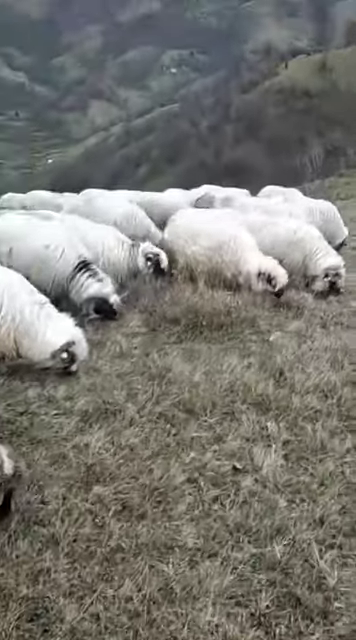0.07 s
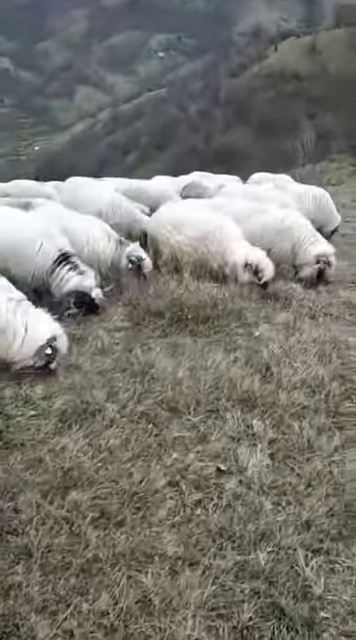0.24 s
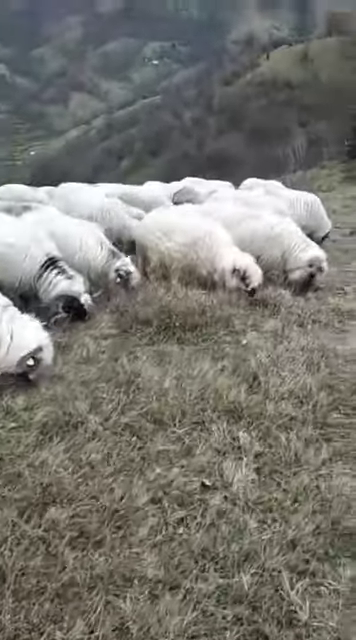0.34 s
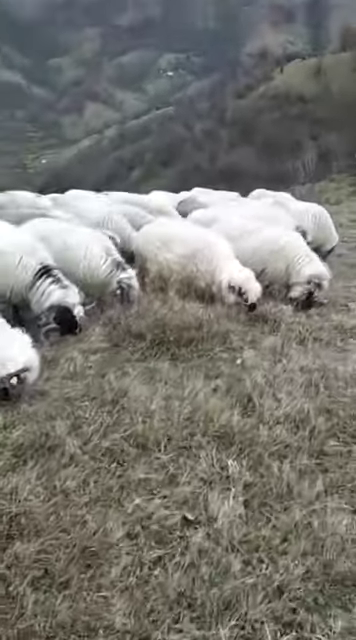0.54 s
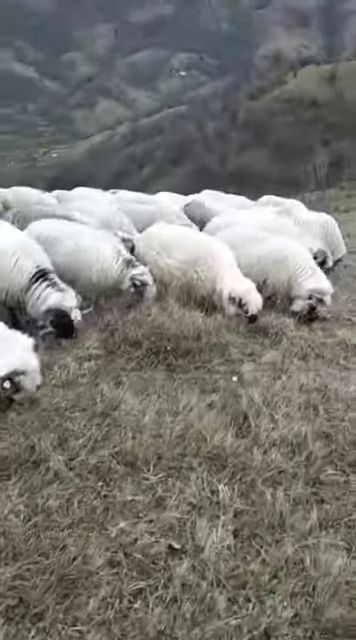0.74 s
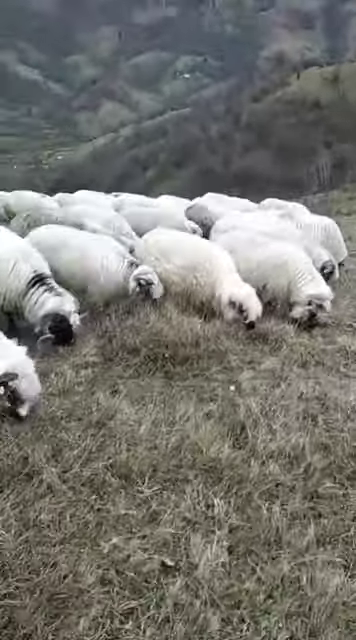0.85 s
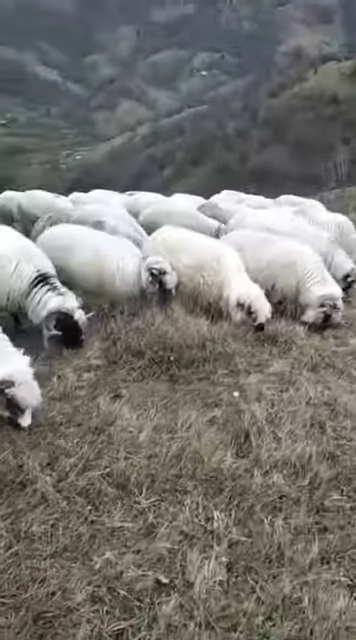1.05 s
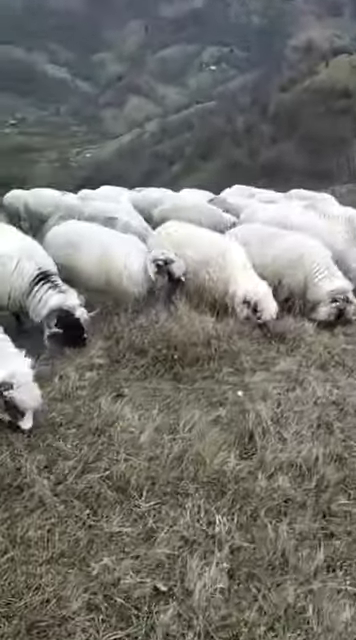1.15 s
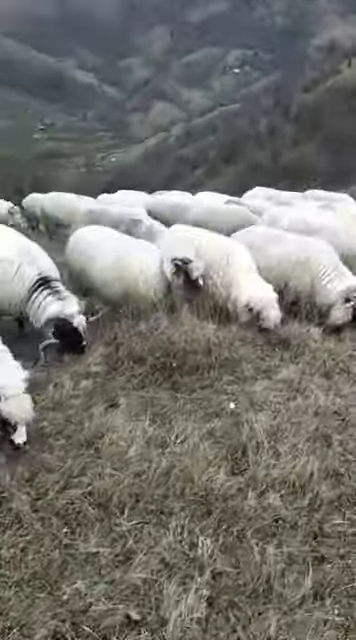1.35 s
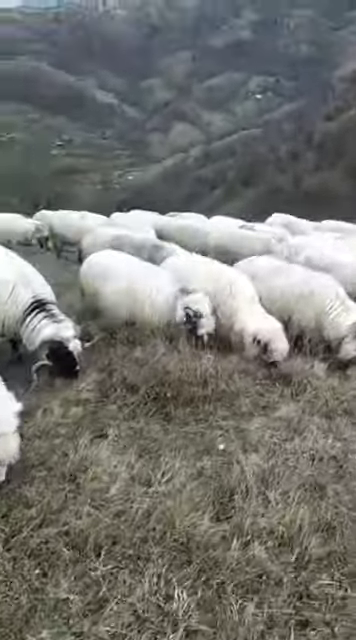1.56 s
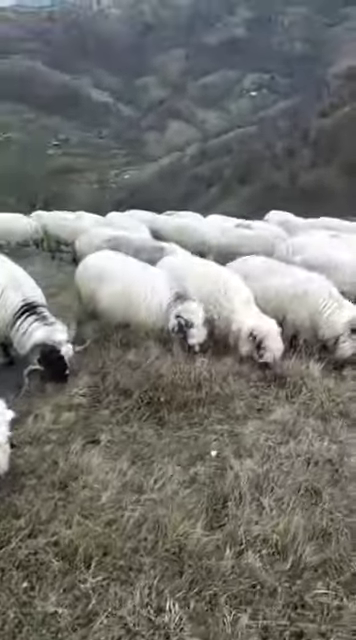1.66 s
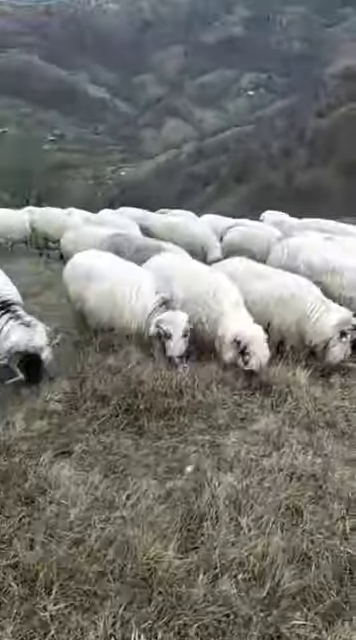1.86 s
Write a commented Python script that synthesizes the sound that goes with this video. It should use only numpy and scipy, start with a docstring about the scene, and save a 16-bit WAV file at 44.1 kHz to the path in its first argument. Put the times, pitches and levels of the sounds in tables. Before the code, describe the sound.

Two sheep bells clank close by on a quiet open hillside. The larger, lower one gives hollow, ringing clanks at about 0.2, 0.6, 1.0 and 1.4 seconds, then softer taps as it hums on. A smaller, higher bell clinks between 0.5 and 0.8 seconds and again at 1.3. Far bells ping faintly on the left, with two barely audible hoof thuds and light wind puffs on the microphone.

```python
"""On an open hillside, two sheet-metal sheep bells clank as the animals tug at the grass.
Each hit of a clapper gives a short hollow note from the air in the bell's mouth, long beating
tones from its metal wall and a bright clank. Behind them far bells ping, hooves thud,
torn grass crackles faintly and a light wind touches the microphone."""
import sys
import numpy as np
from scipy import signal
from scipy.fft import rfft, irfft, next_fast_len
from scipy.io import wavfile

SR = 44100
rng = np.random.default_rng(int(sys.argv[2]) if len(sys.argv) > 2 else 0)


def dump(signal):
    """Clip the signal to [-1, 1] and save it as 16-bit WAV at the path in sys.argv[1]."""
    limited = np.clip(np.atleast_2d(signal).T, -1, 1)
    pcm = np.round(limited * 32767).astype(np.int16)
    wavfile.write(sys.argv[1], SR, pcm)


N = 83790
TIME = np.arange(N) / SR
FFT_SIZE = next_fast_len(N + SR // 2)
FREQS = np.maximum(np.arange(FFT_SIZE // 2 + 1) * SR / FFT_SIZE, 1)


def from_db(db):
    """Turn decibels into a gain."""
    return 10 ** (np.asarray(db) / 20)


def unit_rms(x):
    """Scale a signal to an average (rms) level of 1."""
    return x / np.sqrt(np.mean(x ** 2) + 1e-20)


def at_hz(table, hz, column=1):
    """Read between the rows of a table, on a log-frequency scale."""
    table = np.array(table, float)
    return np.interp(np.log(hz), np.log(table[:, 0]), table[:, column])


def filtered(x, gain):
    """Give each frequency its own gain."""
    return irfft(rfft(x, FFT_SIZE) * gain, FFT_SIZE)[..., :N]


def noise(spectrum, channels=1):
    """Noise with the given spectrum, at an rms level of 1."""
    white = rng.standard_normal((channels, N))
    return unit_rms(filtered(white, from_db(at_hz(spectrum, FREQS))))


def clicks(times, sizes):
    """One click for each hit."""
    out = np.zeros(N)
    np.add.at(out, np.clip(np.round(times * SR).astype(int), 0, N - 1), sizes)
    return out + 1e-18


def fading(times, db, ring_s):
    """Level of a vibration that gains energy at each hit and falls 60 dB in ring_s."""
    energy_kept = from_db(-60 / (ring_s * SR)) ** 2
    return np.sqrt(signal.lfilter([1], [1, -energy_kept], clicks(times, from_db(db) ** 2)))


def smoothed(x, rise_s):
    """Round off sudden jumps."""
    kept = np.exp(-1 / (rise_s * SR))
    return signal.lfilter([1 - kept], [1, -kept], x)


def sine(hz):
    """A pure tone of steady or moving pitch, at a random phase."""
    return np.sin(2 * np.pi * (np.cumsum(hz * np.ones(N)) / SR + rng.random()))


def ring(x, hz, ring_s):
    """Each click starts a tone that falls 60 dB in ring_s."""
    kept = np.exp(-np.log(1000) / (ring_s * SR))
    step = 2 * np.pi * hz / SR
    return signal.lfilter([0, np.sin(step)], [1, -2 * kept * np.cos(step), kept * kept], x)


def swell(time, length, db):
    """A smooth hump of level, centred on the given time."""
    return from_db(db) * np.exp(-2 * ((TIME - time) / (.5 * length)) ** 2)


def waver(rate_hz):
    """A slow random wobble, roughly between -1 and 1."""
    points = rng.standard_normal(64)
    return np.interp(TIME * rate_hz, np.arange(len(points)), points)


# the hush of the hillside: (frequency [Hz], relative level [dB])
AIR_SPECTRUM = [(25, 3.5), (280, -15), (540, -3), (800, -21.5), (1400, -16.5), (2600, -21), (3500, -31),
                (6000, -27.5), (10000, -42.5), (15500, -57)]

def air():
    """Still air and the distant flock blend into a hush, most alike in both ears near 300 Hz."""
    alike = at_hz([(50, 0.53), (300, 0.95), (5000, 0.12)], FREQS)
    mid, side = noise(AIR_SPECTRUM, channels=2)
    shared = filtered(mid, np.sqrt(1 + alike))
    opposite = filtered(side, np.sqrt(1 - alike)) * np.array([[1], [-1]])
    return from_db(-52.5) * (shared + opposite)


# tearing grass: (frequency [Hz], relative level [dB])
GRASS_SPECTRUM = [(2500, -8.5), (6000, -10.5), (15500, -35.5)]

def grass(snaps_per_s=110):
    """Blades of grass tear with tiny snaps at random moments."""
    snaps = (rng.random(N) < snaps_per_s / SR) * rng.standard_normal((2, N))
    return from_db(-70.5) * unit_rms(filtered(snaps, from_db(at_hz(GRASS_SPECTRUM, FREQS))))


# puffs of wind: (time [s], length [s], level on the left [dB])
WIND_GUSTS = [(.36, 0.31, -40), (1.18, 0.23, -36), (1.865, 0.14, -33.5)]
# their rumble: (frequency [Hz], relative level [dB])
WIND_SPECTRUM = [(35, -2), (120, -14.5), (2500, -92)]

def wind():
    """Gusts rumble on the microphone, mostly on the left."""
    level = sum(swell(*gust) for gust in WIND_GUSTS)
    return level * noise(WIND_SPECTRUM, channels=2) * from_db([[0], [-19]])


# pings of far bells: (time [s], pitch [Hz], relative level [dB])
FAR_PINGS = [(0.064, 1378, -41), (0.349, 538.6, -47.5), (1.432, 1362, -46), (1.636, 1390, -47.5)]

def far_bells(ring_cycles=330):
    """Soft short notes far to the left, their clank lost on the way."""
    notes = 0
    for time, hz, db in FAR_PINGS:
        level = fading(np.array([time]), [db], ring_cycles / hz)
        notes = notes + smoothed(level, rise_s=0.0014) * sine(hz)
    return np.array([[2.42], [-0.082]]) * notes  # left and right gains


# hoof steps: (time [s], length [s], centre frequency [Hz], level [dB])
HOOF_STEPS = [(0.934, 0.029, 278, -47), (1.416, 0.025, 216, -43)]

def hooves(half_width_octaves=0.68):
    """Each hoof lands on turf with a short, dull burst of noise."""
    out = 0
    for time, length, hz, db in HOOF_STEPS:
        band = np.exp(-.5 * (np.log2(FREQS / hz) / half_width_octaves) ** 2)
        thud = unit_rms(filtered(rng.standard_normal(N), band))
        out = out + swell(time, length, db) * thud
    return out


# the clapper's contact: (frequency [Hz], relative level [dB])
KNOCK_SPECTRUM = [(300, -22), (1400, 4), (2200, 0), (3500, -14.5), (6000, -10), (15500, -59.5)]

def knock(times, db):
    """The clapper meets the metal with a very short burst of noise."""
    level = smoothed(fading(times, db, ring_s=0.047), rise_s=0.00019)
    return level * noise(KNOCK_SPECTRUM)


def clank(times, db, spectrum, count=110, scatter_db=5, build_s=0.0015):
    """The metal's many high tones, each struck with a new strength at every hit."""
    pitches = 3400 + 12000 * (np.arange(count) + rng.random(count)) / count
    gains = from_db(at_hz(spectrum, pitches))
    gains = gains / np.sqrt(np.sum(gains ** 2) / 2)
    ears = 1 + 0.97 * rng.standard_normal((count, 2, 1))  # each tone differs between the ears
    chance = rng.standard_normal((len(times), 3, count))
    out = 0
    for k, hz in enumerate(pitches):
        strength, direction, lag = chance[:, :, k].T
        force = from_db(db + scatter_db * strength) * np.sign(direction)
        hits = clicks(times + build_s * np.abs(lag), force)
        ring_s = 0.14 * (6000 / hz) ** 0.41  # higher tones die sooner
        out = out + gains[k] * ears[k] * ring(hits, hz, ring_s)
    return from_db(-3.5) * out


def scattered(sound, fade_s=0.75):
    """Scattered sound comes back as a faint wash of echoes."""
    echoes = rng.standard_normal((2, N)) * from_db(-60 * TIME / fade_s)
    return from_db(-16) * filtered(sound, rfft(unit_rms(echoes) / np.sqrt(N), FFT_SIZE))


def hollow_note(times, db, tail_db, hz, swell_s, tail_s, lift_hz):
    """The air in the bell's mouth swells after each hit, sags in pitch and dies into a tail."""
    age = np.maximum(TIME - times[:, None], 0)
    rise = age / swell_s
    curve = 1.11  # above 1, the note falls faster than an exponential
    body = rise * np.exp((1 - rise ** curve) / curve)
    # the tail is weak if the clapper stays on the wall
    tail = from_db(tail_db[:, None] - 60 * age / tail_s) * (1 - np.exp(-rise))
    power = (from_db(db)[:, None] * (body + tail)) ** 2
    freshness = (power * np.exp(-age / 0.0604)).sum(0) / (power.sum(0) + 1e-20)
    return np.sqrt(power.sum(0)) * sine(hz + lift_hz * freshness)


def wall_ring(times, low_db, high_db, tones, hum=None, late_after_s=0.94):
    """The wall's long tones waver as the bell swings; close pitches beat against each other."""
    out = 0
    for k, (hz, db, ring_s, late_db) in enumerate(tones):
        hit_db = (high_db if hz > 2500 else low_db) + 2.9 * rng.standard_normal(len(times))
        sway_db = 3 * waver(rate_hz=6.13)
        if hum and k == 0:  # the hum has its own hit strengths and sway
            hit_db, sway_db = hum
        level = fading(times, hit_db + db + (times > late_after_s) * late_db, ring_s)
        pitch = hz * (1 + 0.001223 * waver(rate_hz=9))  # makes the beats uneven
        out = out + smoothed(level, rise_s=0.001) * from_db(sway_db) * sine(pitch)
    return out


def bell(hits, mouth, wall_tones, clank_spectrum, position, hum_sway=None):
    """The clapper sets air and metal ringing, and the sound reaches each ear differently."""
    times, hollow_db, tail_db, low_db, high_db, clank_db, knock_db = np.transpose(hits)
    bright = knock(times, knock_db) + clank(times, clank_db, clank_spectrum)
    echoes = scattered(bright)
    hollow = hollow_note(times, hollow_db, tail_db, **mouth)
    hum = (hollow_db, np.interp(TIME, *np.transpose(hum_sway))) if hum_sway else None
    wall = wall_ring(times, low_db, high_db, wall_tones, hum)
    half_each = np.array([[.5], [-.5]])
    ear_gain = from_db(half_each * at_hz(position, FREQS))
    ear_phase = np.exp(1j * half_each * at_hz(position, FREQS, column=2))
    return filtered(hollow + wall + bright + echoes, ear_gain * ear_phase)


# clapper hits and how strongly they start each part: (time [s], hollow note [dB],
# tail compared with that note [dB], low wall tones [dB], high wall tones [dB], clank [dB], knock [dB])
SMALL_HITS = [(0.550, -33.5, -3.5, -59.5, -62.5, -59, -45), (0.604, -36.5, -9, -53, -49.5, -44.5, -34),
              (0.656, -32.5, 0, -74, -61.5, -51, -48), (0.8175, -27, -14, -45, -55, -42, -40.5),
              (1.310, -38, -5, -59, -56, -50, -51.5)]
# tones of the wall: (pitch [Hz], relative level [dB], ring time [s], change for late hits [dB])
SMALL_TONES = [(1549, 4, 1.85, -2), (2882, -1, 1.46, 8), (2907, 3.5, 0.73, -1), (5840, 3.5, 0.23, 0)]
# colour of the clank: (frequency [Hz], relative level [dB])
SMALL_CLANK_SPECTRUM = [(3400, -26), (5200, -7.5), (6100, 0), (7500, -17.5), (15500, -36.5)]
# where the bell is heard: (frequency [Hz], left minus right [dB], left ahead by [radians])
SMALL_POSITION = [(597, 0, 0.73), (2960, -2, 1.84), (6170, 10, 2.3), (9800, -11.5, 2.9)]

def small_bell():
    """The smaller bell holds less air, so its hollow note is higher."""
    mouth = dict(hz=579.5, swell_s=0.008, tail_s=0.6, lift_hz=12.1)
    return bell(SMALL_HITS, mouth, SMALL_TONES, SMALL_CLANK_SPECTRUM, SMALL_POSITION)


# clapper hits and how strongly they start each part: (time [s], hollow note and hum [dB],
# tail compared with that note [dB], low wall tones [dB], high wall tones [dB], clank [dB], knock [dB])
LARGE_HITS = [(0.030, -31.5, -16, -48, -41.5, -45, -60), (0.2025, -17.5, -7, -40.5, -39, -40, -43),
              (0.5655, -17, -13.5, -35, -42, -44.5, -38.5), (0.9815, -19.5, -27, -37.5, -45, -41.5, -34.5),
              (1.025, -55, -17, -44.5, -43.5, -41.5, -42), (1.1255, -28.5, -10, -38, -47, -47.5, -42),
              (1.3845, -21.5, -15.5, -39, -42.5, -38.5, -34.5), (1.530, -42.5, 4, -46.5, -43, -50.5, -48.5),
              (1.666, -52, -19, -49, -50, -50, -65), (1.831, -39.5, -1, -56.5, -52, -51, -55)]
# wall tones, hum first: (pitch [Hz], relative level [dB], ring time [s], change for late hits [dB])
LARGE_TONES = [(1112.4, -21, 2.11, -0.5), (424.5, -14, 3.86, 6), (1480, -20, 2, -0.5), (1990, -6, .8, -7),
               (2005.5, 0, 1.1, 1), (2034, -14, 1.5, 7), (3047, -9, .7, -8), (3073, -17, 1.5, 8),
               (4124, -11, .9, -5), (4146, -21, 1.3, 9), (2768, -19, 1.2, 4.5), (6220, -8.5, 0.43, -4)]
# colour of the clank: (frequency [Hz], relative level [dB])
LARGE_CLANK_SPECTRUM = [(3400, -19.5), (4500, -1), (5300, -8.5), (6200, 1), (7500, -14.5), (9800, -19.5),
                        (15500, -48)]
# where the bell is heard: (frequency [Hz], left minus right [dB], left ahead by [radians])
LARGE_POSITION = [(427, -1.5, 0.39), (1130, 2.5, 0.77), (2070, 4, 0.52), (3000, 0.5, 1.3), (4330, 8, 0.81),
                  (6330, 3.5, 2.48), (8350, -14, 2.9), (15000, -9, 1.7)]
# the hum's rise and fall: (time [s], level change [dB])
LARGE_HUM_SWAY = [(.29, 2.5), (.38, -1), (.52, 2), (.75, -2), (1.04, -2), (1.23, 5), (1.36, 0.5),
                  (1.46, 1.5), (1.78, -4.5)]

def large_bell():
    """The larger bell is lower and louder, and its wall keeps humming between hits."""
    mouth = dict(hz=413.5, swell_s=0.016, tail_s=0.39, lift_hz=6.93)
    return bell(LARGE_HITS, mouth, LARGE_TONES, LARGE_CLANK_SPECTRUM, LARGE_POSITION, LARGE_HUM_SWAY)


def scene():
    """Two near bells over the quiet sounds of the hillside."""
    return large_bell() + small_bell() + far_bells() + hooves() + air() + grass() + wind()


def record(dry):
    """Cut the highest treble steeply."""
    cutoff_hz = 15900
    return signal.sosfilt(signal.ellip(10, .1, 80, cutoff_hz, fs=SR, output="sos"), dry)


dry = scene()
out = record(dry)
dump(out)
```